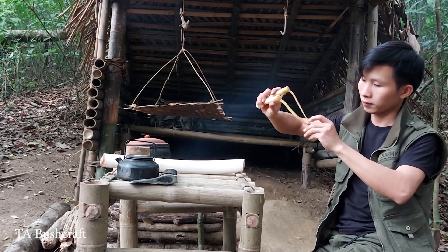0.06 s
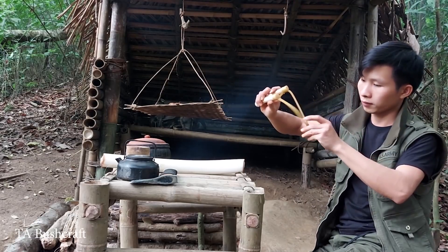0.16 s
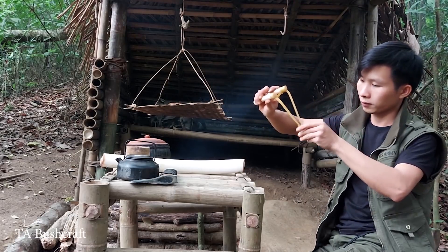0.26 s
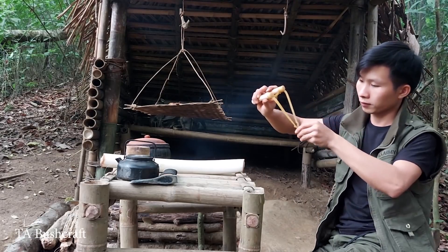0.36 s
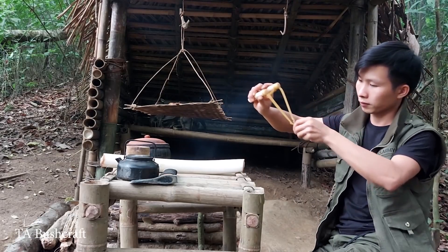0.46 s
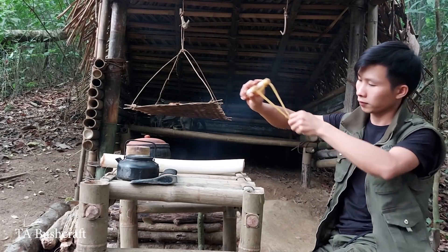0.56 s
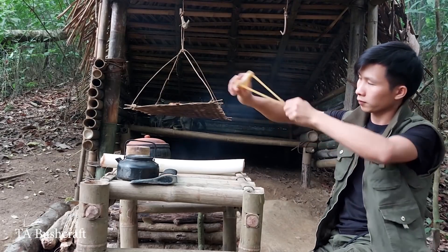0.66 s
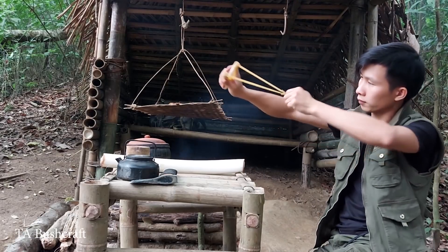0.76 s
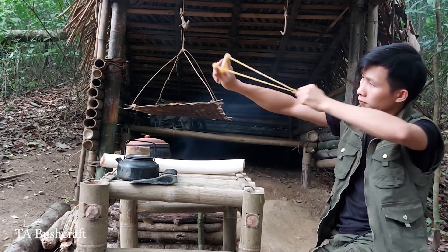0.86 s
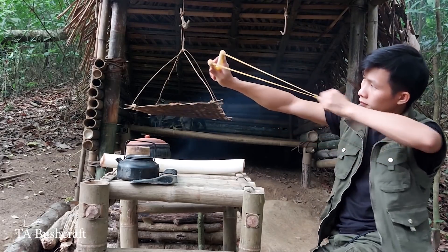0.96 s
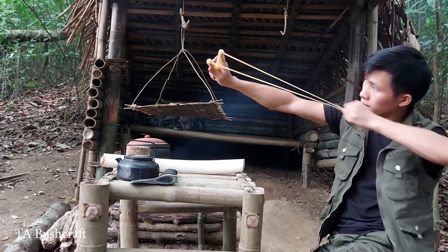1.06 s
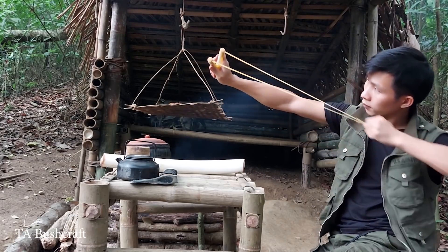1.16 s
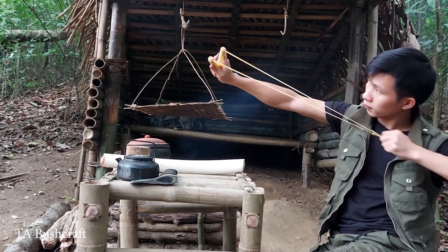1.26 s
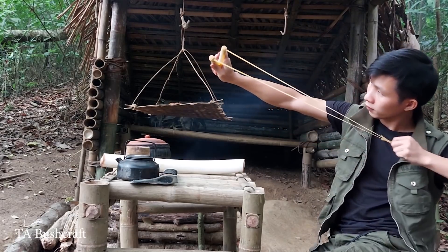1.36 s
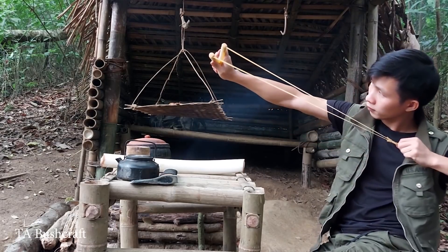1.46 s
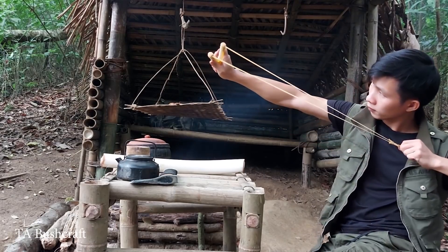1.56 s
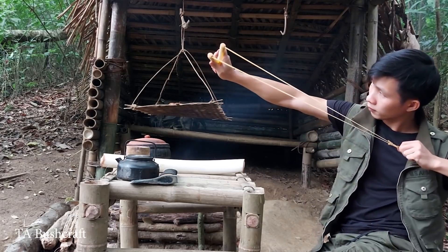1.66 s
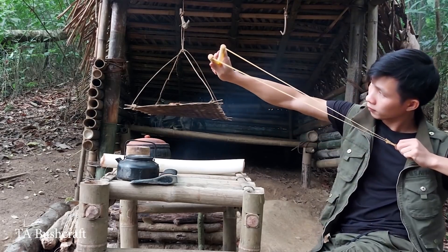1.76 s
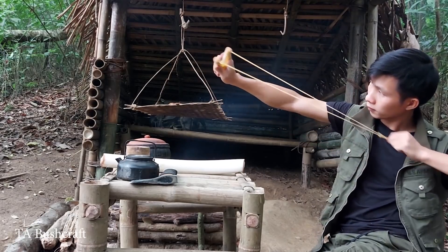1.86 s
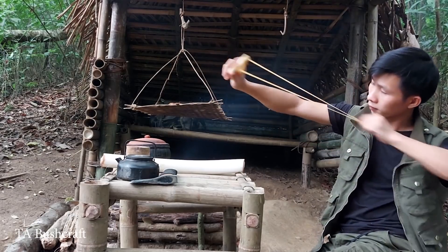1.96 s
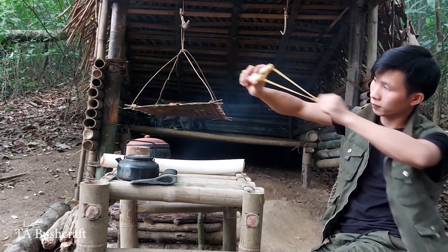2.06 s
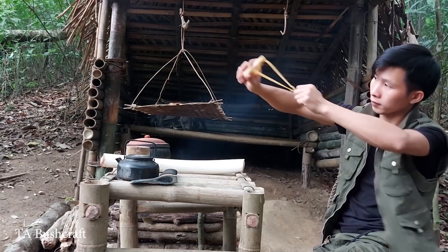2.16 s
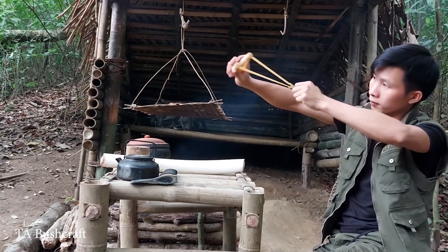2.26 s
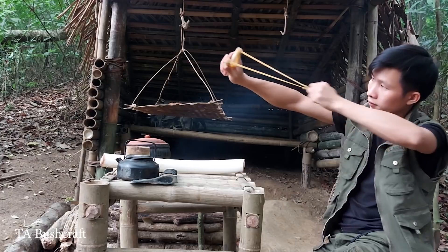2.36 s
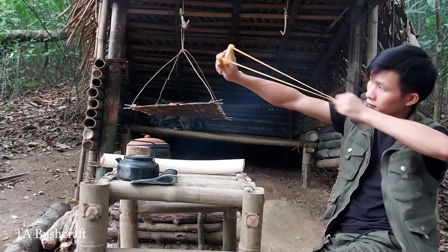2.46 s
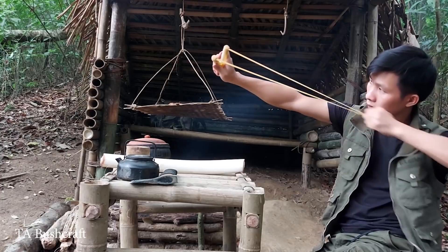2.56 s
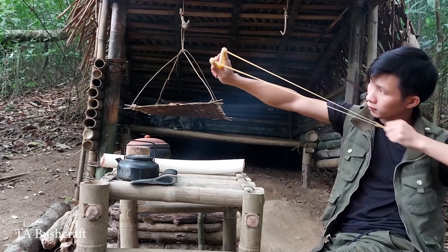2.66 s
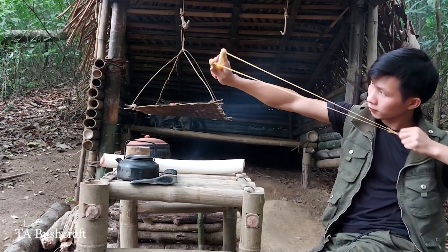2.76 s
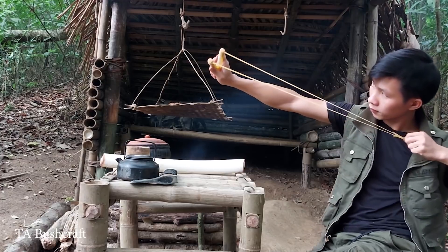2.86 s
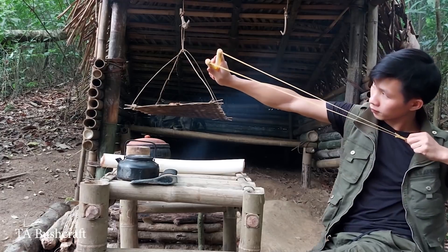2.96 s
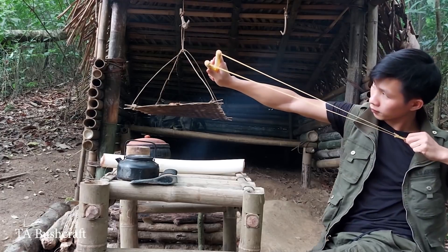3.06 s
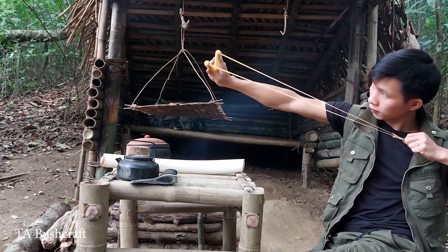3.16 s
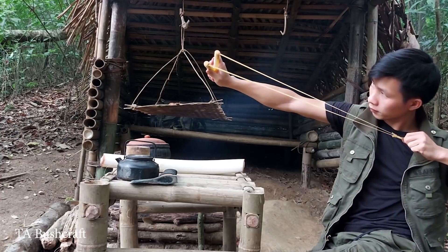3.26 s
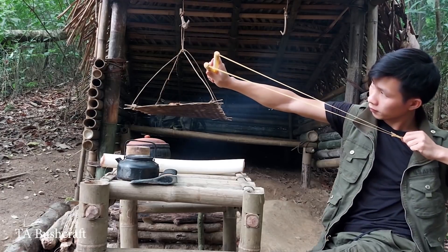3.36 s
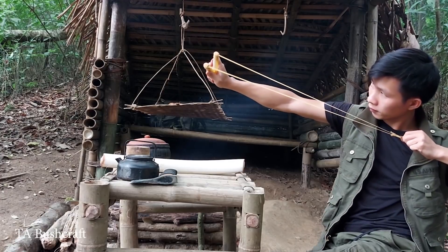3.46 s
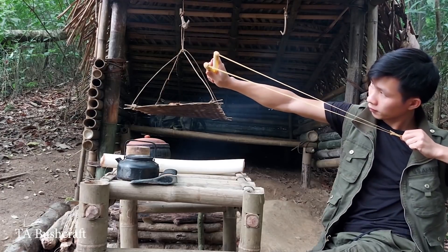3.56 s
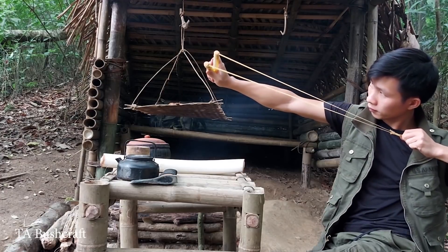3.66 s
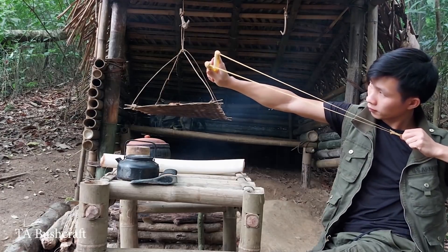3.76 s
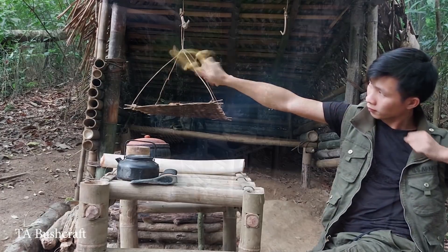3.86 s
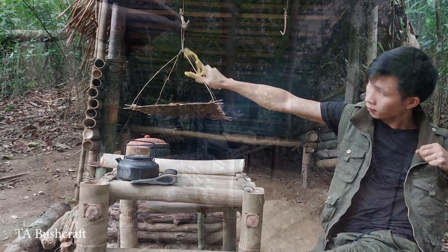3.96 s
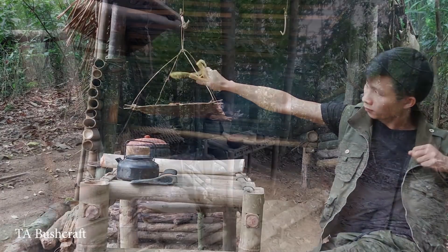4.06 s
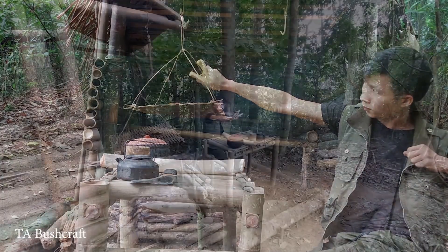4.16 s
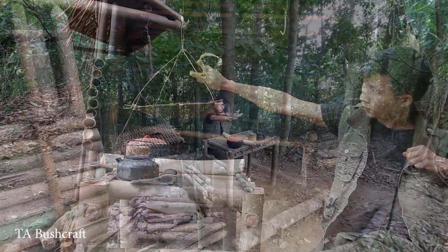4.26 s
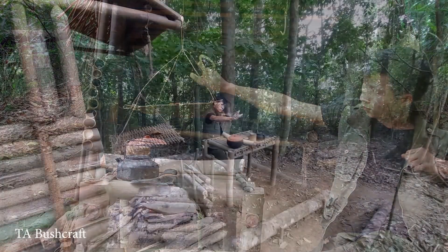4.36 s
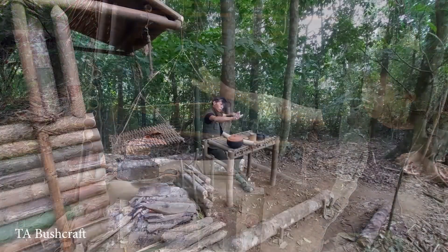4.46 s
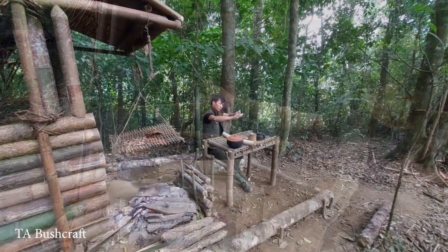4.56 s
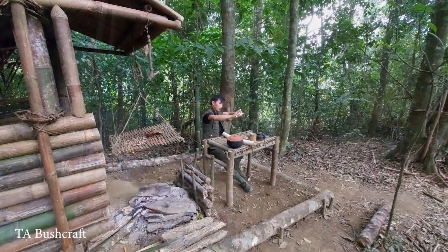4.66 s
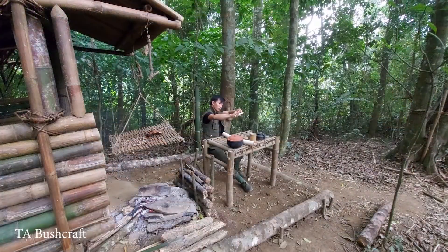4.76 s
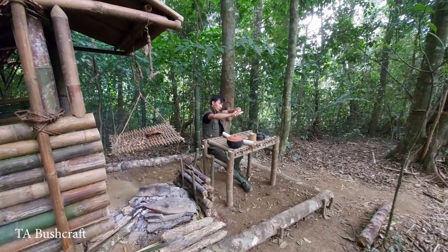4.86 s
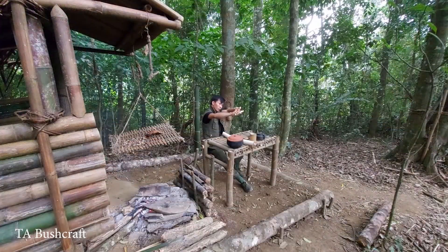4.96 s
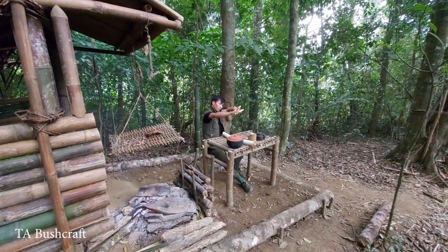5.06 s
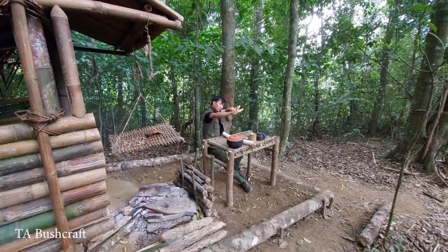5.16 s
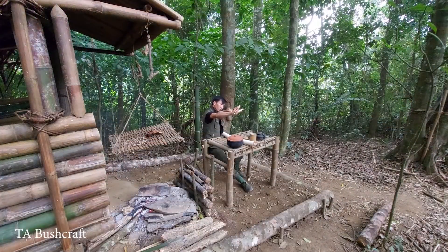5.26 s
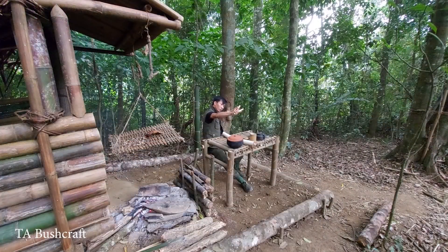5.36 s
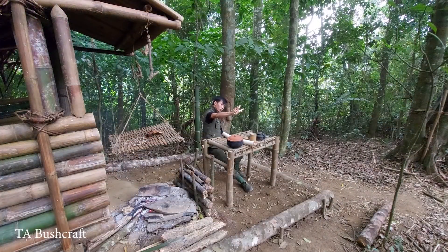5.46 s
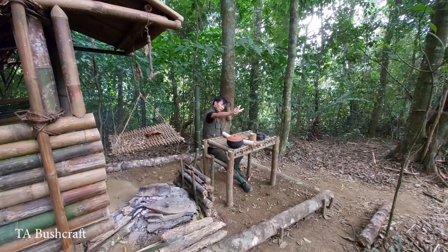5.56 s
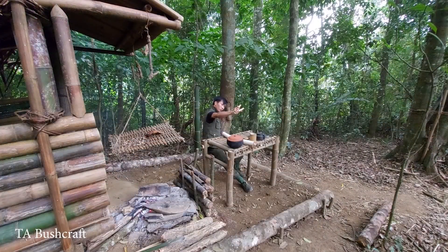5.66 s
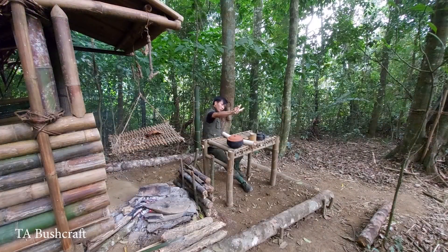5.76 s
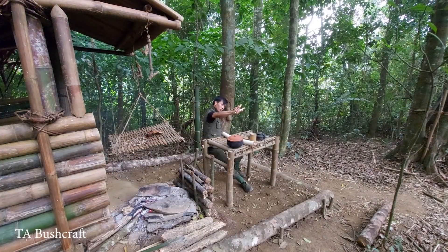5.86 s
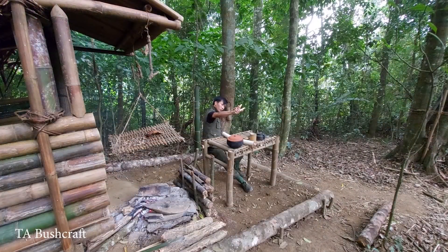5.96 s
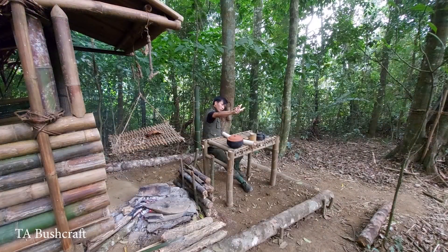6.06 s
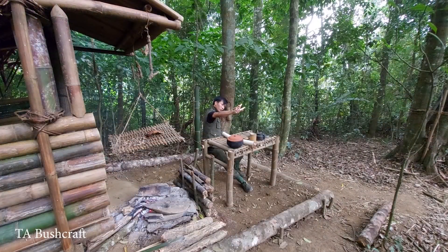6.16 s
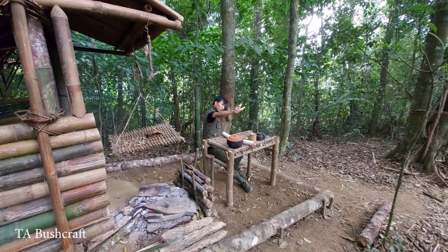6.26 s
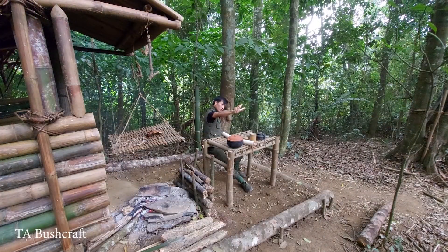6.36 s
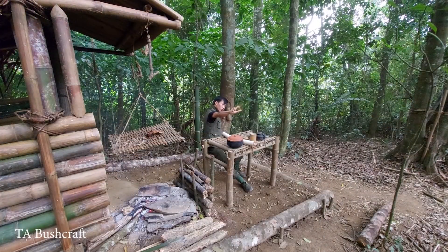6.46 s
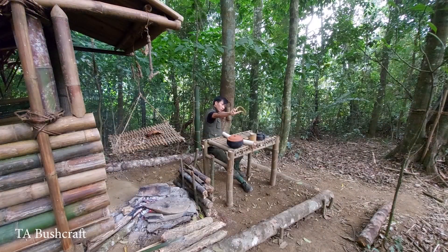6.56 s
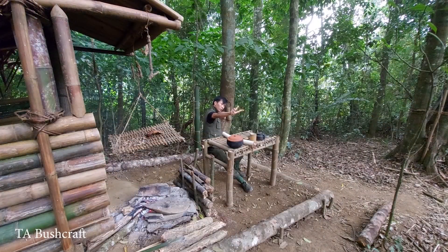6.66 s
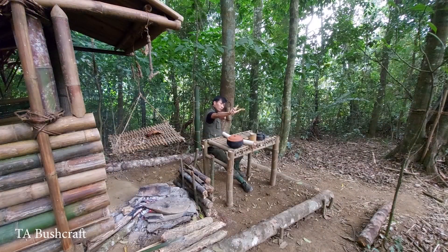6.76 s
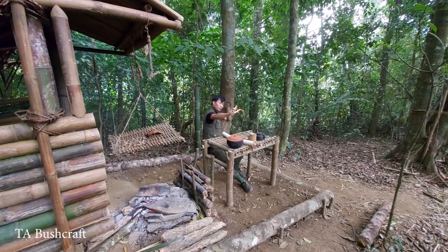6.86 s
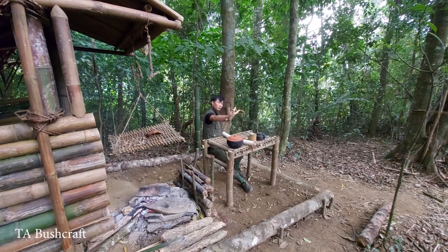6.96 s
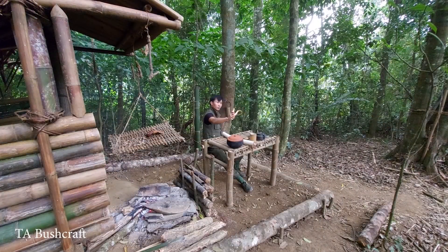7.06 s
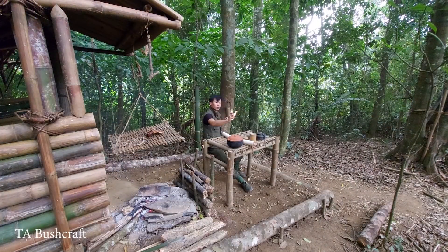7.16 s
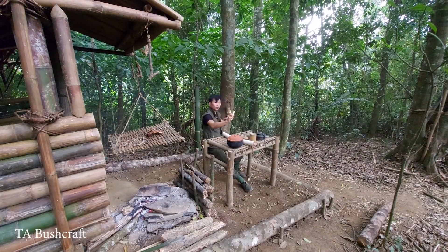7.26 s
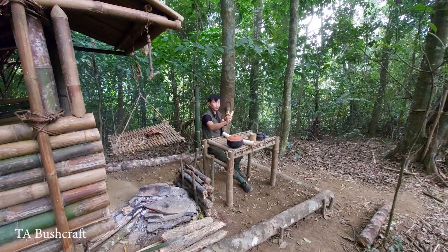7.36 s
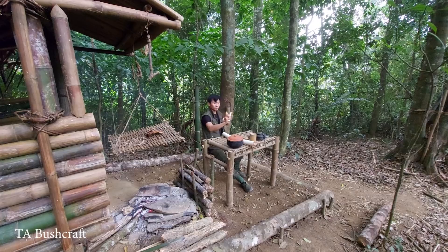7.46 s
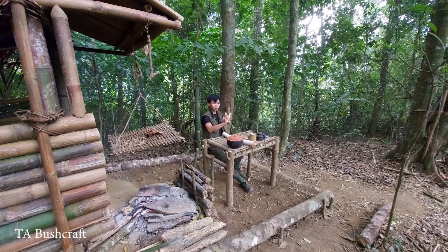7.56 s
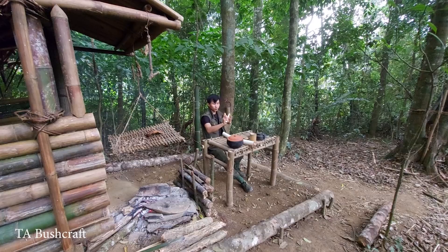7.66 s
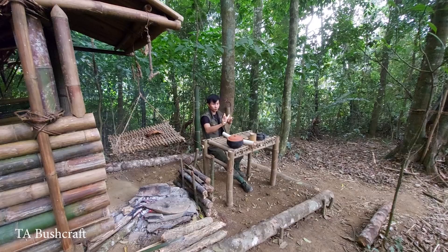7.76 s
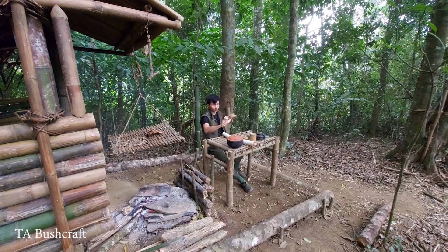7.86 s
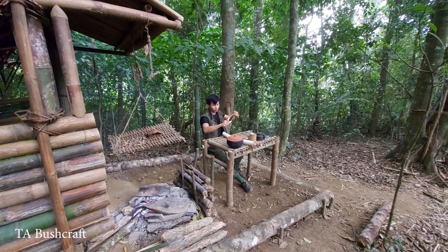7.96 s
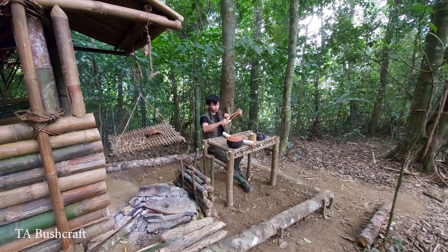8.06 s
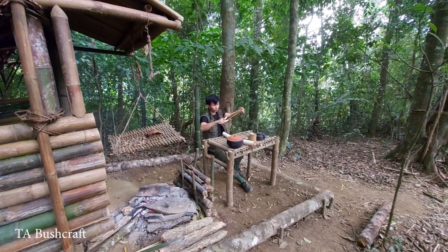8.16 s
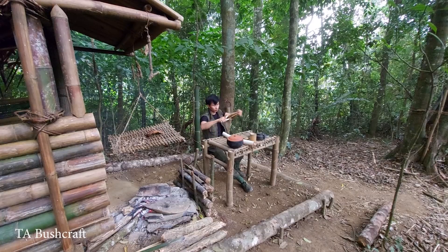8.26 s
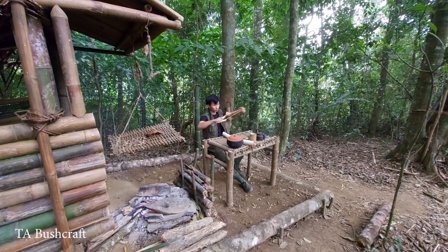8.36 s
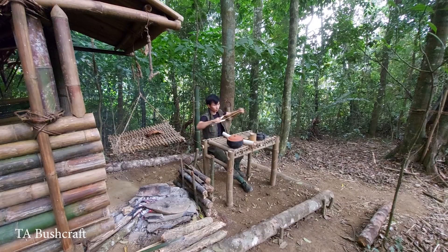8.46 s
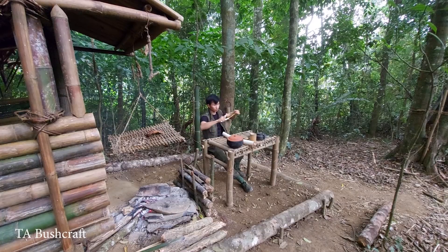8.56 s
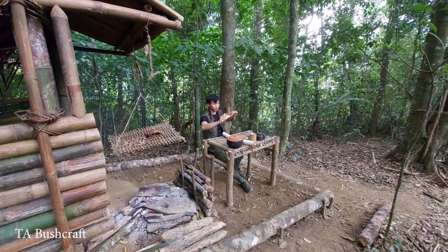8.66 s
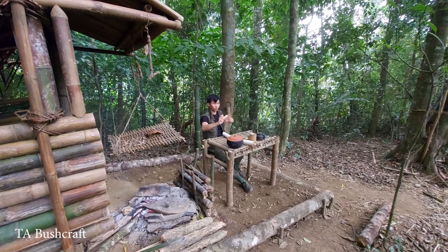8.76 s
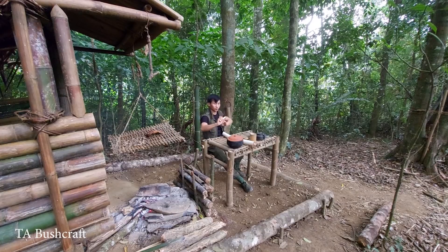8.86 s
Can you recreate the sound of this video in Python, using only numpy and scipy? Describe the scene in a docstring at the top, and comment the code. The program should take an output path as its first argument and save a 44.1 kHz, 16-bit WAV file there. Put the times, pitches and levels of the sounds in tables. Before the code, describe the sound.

A hushed forest, about nine seconds, in wide stereo: soft low air, a steady insect drone near 5 kHz and fine hiss. From 0.5 to 2.8 s rubber bands creak and rub very quietly in the hand, with dry finger ticks; thin rising chirps and a quick hoarse bird phrase sound far off. At 3.9 s the slingshot fires very close: a tiny whip rush, a hard bright crack and slap, a dull wooden knock and a low air thump mainly left, then a hissy echo from trunks fading within half a second. From about 4.3 s a bird hoots in quick threes near 790 Hz roughly every 0.65 s. A sharper tick comes at 4.75 s, just after a thin steel clink. At 6.4 s the second crack hits, with less air thump. Afterwards only hoots, faint high clinks around 7.7 to 8.3 s, ticks and insects remain.

```python
"""A slingshot fires twice close to a stereo microphone at a forest camp: the bands whip forward, the pouch slaps,
the rubber cracks, and the trunks scatter a bright noise tail. The first puff of air hits mainly the left port.
In the hand, rubber creaks in grains of noise, fingers tick and steel shot rings in short noise bursts.
Out in the forest one bird hoots in threes and others chirp far off, all as gliding sines with echo;
behind them lie low air, an insect drone near 5 kHz and a fine hiss, all shaped noise."""
import sys
import numpy as np
from scipy import signal
from scipy.fft import rfft, irfft, next_fast_len
from scipy.io import wavfile
from scipy.ndimage import uniform_filter1d, map_coordinates

SR = 44100
rng = np.random.default_rng(int(sys.argv[2]) if len(sys.argv) > 2 else 0)


def pcm_store(signal):
    """Save signal as 16-bit PCM."""
    levels = np.round(np.clip(np.atleast_2d(signal), -1, 1) * 32767)
    wavfile.write(sys.argv[1], SR, levels.astype(np.int16).T)


N = 392931


def amp(db):
    """Decibels to gain."""
    return 10 ** (np.asarray(db) / 20)


def unit(x):
    """Scaled to rms 1."""
    return x / np.sqrt(np.mean(x ** 2) + 1e-20)


def along(points, hz):
    """Values at hz, read from (Hz, value) points on a log frequency axis."""
    point_hz, values = np.transpose(points)
    return np.interp(np.log(hz + 1), np.log(point_hz + 1), values)


def wobble(rate):
    """A smooth random curve with rate knots a second."""
    knots = rng.standard_normal(int(N * rate / SR) + 4)
    return map_coordinates(knots, [np.arange(N) * rate / SR])


def fade(t, t60):
    """Silence before t = 0, then an exponential decay by 60 dB in t60 seconds."""
    return (t >= 0) * np.exp(-np.log(1000) * np.abs(t) / t60)


def add(out, s, x):
    """Mix x into out from second s on."""
    start = round(s * SR)
    x = x[..., max(-start, 0):N - start]
    start = max(start, 0)
    out[..., start:start + x.shape[-1]] += x


# Likeness of the two microphone ports. Each row: frequency in Hz, left-right correlation from 0 to 1.
PORT_LIKENESS = [(60, 0.24), (300, 0.25), (800, 0.22), (2000, 0.018), (5000, 0.002), (12000, 0.028)]


def noise(spectrum, size=N, rings=()):
    """Stereo noise of rms 1 with resonant humps; the ports are partly alike in the bass, hardly in the treble."""
    m = next_fast_len(size)
    hz = np.fft.rfftfreq(m, 1 / SR)
    level = along(spectrum, hz)
    for ring_hz, width_hz, db in rings:
        level = level + db / (1 + (2 * (hz - ring_hz) / width_hz) ** 2)
    # mid and side in this proportion give the wanted correlation
    turn = np.arccos(np.clip(along(PORT_LIKENESS, hz), -1, 1)) / 2
    white = rfft(rng.standard_normal((2, m)))
    mid, side = irfft(white * amp(level) * [np.cos(turn), np.sin(turn)], m)[:, :size]
    return unit(np.array([mid + side, mid - side]))


def among_trees(x, t60, direct_db, wet_db):
    """A sound plus the diffuse answer of trunks and leaves: convolution with decaying noise."""
    t = np.arange(SR) / SR
    swell = 1 - np.exp(-t / .008)
    tail = noise([(20, 0), (20000, 0)], size=SR) * fade(t, t60) * swell
    wet = signal.fftconvolve(np.atleast_2d(x), tail / np.linalg.norm(tail[0]), axes=1)[:, :N]
    return amp(direct_db) * x + amp(wet_db) * wet


# The sharp first crack of rubber on the fork, close by.
# Each row: frequency in Hz, relative level per Hz in dB.
CRACK_COLOUR = [(60, -16), (400, -6.5), (1000, -10), (1900, -8), (3300, -6), (5200, 2), (6200, 0),
                (7300, -6), (10500, 0.5), (13000, -2), (15800, -6)]


def rubber_crack(t, crack_db, t60, rings):
    """Rubber hits the fork: a burst of noise with a rise of about a millisecond and a short decay."""
    rise = np.clip(t / 0.00097, 0, 1)
    return amp(crack_db) * fade(t, t60) * rise * noise(CRACK_COLOUR, size=SR, rings=rings)


# Echo from the far trunks, with bass and top lost on the way.
# Each row: frequency in Hz, relative level per Hz in dB.
FAR_ECHO_COLOUR = [(100, -15.5), (1000, -14), (2000, -10.5), (2400, 0.5), (3400, -3.5), (4400, 4.5),
                   (7000, -3), (10500, -2), (15800, -12)]


def whip_and_trunks(t, lead, whip_db, scatter_db, colour, rings, near_t60=0.39, far_t60=0.6, far_db=-17):
    """Bands rush through the air before the crack; near and far trunks scatter it back as decaying noise."""
    whip = amp(whip_db) * np.exp(-(t / lead) ** 6) * (t < .001)
    # the echo builds within 4.4 ms and its level trembles slightly
    scatter = amp(scatter_db + 0.3 * wobble(160)[:SR]) * np.clip(t / 0.0044, 0, 1)
    rush = (whip + scatter * fade(t, near_t60)) * noise(colour, size=SR, rings=rings)
    far_noise = noise(FAR_ECHO_COLOUR, size=SR, rings=rings)
    far = scatter * amp(far_db) * fade(t, far_t60) * far_noise
    return rush + far


def pouch_slap(t, slap_db, width=0.00039):
    """The pouch stops dead: one push of air and a slower suction."""
    age = np.maximum(t - .0014, 0) / width
    push, suction = np.exp(-age), np.exp(-age / 4) / 16
    return amp(slap_db) * np.e * age * (push - suction)


# Dull knock of fork and fist, close by. Each row: frequency in Hz, relative level per Hz in dB.
KNOCK_COLOUR = [(30, -13.5), (70, -1.5), (125, -0.5), (200, -9.5), (320, 3.5), (400, -6.5), (520, -3),
                (650, -5.5), (900, -12.5), (1180, -9.5), (1500, -14), (3000, -31.5)]
# Low modes of the wooden fork in the fist. Each row: frequency in Hz, level in dB, 60 dB decay in seconds.
FORK_MODES = [(308.4, -19.5, 0.11), (388, -25, 0.037), (502, -23, 0.021)]


def fork_knock(t, knock_db, t60=0.13):
    """Fork and fist give a dull noise burst and the wooden modes ring as decaying sines, alike on both ports."""
    knock = amp(knock_db) * fade(t - .001, t60) * noise(KNOCK_COLOUR, size=SR)[0]
    for hz, db, mode_t60 in FORK_MODES:
        knock = knock + amp(db) * fade(t, mode_t60) * np.sin(2 * np.pi * hz * t)
    return knock


def air_puff(t, start_hz, end_hz, settle, t60):
    """A gust overloads a microphone port, which swings back ever more slowly: a falling, decaying sine."""
    age = np.maximum(t, 0)
    cycles = end_hz * age + (start_hz - end_hz) * settle * (1 - np.exp(-age / settle))
    return -np.sin(2 * np.pi * cycles) * fade(t, t60)


# Two short low knocks at the second shot, near 780 and 1155 Hz.
# Each row: centre in seconds, frequency in Hz, level in dB, half length in seconds.
SHOT_KNOCKS = [(6.3973, 780.5, -14, 0.0039), (6.3989, 1155, -21, 0.0036)]


def shot_knocks(out, t, early):
    """Two short low knocks at the second shot: sines under bell-shaped swells, mixed into out."""
    for s, hz, db, half in SHOT_KNOCKS:
        add(out, s - early, amp(db) * np.exp(-(t / half) ** 2) * np.sin(2 * np.pi * hz * t))


# The two shots, close to the microphone. Each row: start in seconds, whip lead in seconds, whip level in dB,
# crack level in dB, crack 60 dB decay in seconds, scatter level in dB, slap level in dB, knock noise level in dB,
# air puff level in dB, puff delay in seconds, final puff frequency in Hz, puff on the right port in dB re left.
SHOT_TABLE = [(3.8929, 0.0071, -20.5, -0.5, 0.019, -11, -5.5, -24, -3, .003, 52.1, -28.5),
              (6.3955, 0.005, -22, -0.5, 0.034, -11, -9, -18.5, -11.5, .006, 95, -1)]
# Colour of whip and near echo, one list for each shot.
# Each row: frequency in Hz, relative level per Hz in dB.
SHOT_COLOURS = [
    [(30, -19), (100, -15.5), (200, -17), (350, -19.5), (600, -9.5), (1000, -15), (2000, -9.5), (3200, -6),
     (4600, -3.5), (7500, -6), (10000, 3), (13000, 0), (15800, -3.5)],
    [(30, -22.5), (100, -12.5), (200, -17.5), (320, -15.5), (600, -14), (1000, -11), (2000, -11),
     (3400, -5), (4600, -0.5), (7500, -4.5), (10500, 5), (13000, 2.5), (15800, -5)],
]
# Resonances of the taut bands and pouch, one list for each shot.
# Each row: frequency in Hz, width in Hz, height in dB.
BAND_RINGS = [
    [(330, 68, 5), (1100, 180, 4), (2704, 320, 5.5), (4450, 500, 1.5)],
    [(322, 36, 4.5), (810, 160, 4.5), (1822, 220, 1.5), (2660, 470, 12.5), (6040, 270, 4)],
]


def shots(puff_cycles=4.7):
    """The bands whip, crack and slap, the fork knocks, air puffs at the ports and the forest answers."""
    out = np.zeros((2, N))
    early = .02  # seconds kept before t = 0 for the whip
    t = np.arange(SR) / SR - early
    for shot, colour, rings in zip(SHOT_TABLE, SHOT_COLOURS, BAND_RINGS):
        (s, lead, whip_db, crack_db, crack_t60, scatter_db, slap_db, knock_db,
         puff_db, puff_delay, puff_hz, right_db) = shot
        bright = rubber_crack(t, crack_db, crack_t60, rings)
        bright = bright + whip_and_trunks(t, lead, whip_db, scatter_db, colour, rings)
        thump = pouch_slap(t, slap_db) + fork_knock(t, knock_db)
        puff = amp(puff_db) * air_puff(t - puff_delay, start_hz=118, end_hz=puff_hz, settle=0.0032,
                                       t60=puff_cycles / puff_hz)
        # dB offsets for the left and the right port
        add(out, s - early, bright * amp([[.4], [-.4]]) + thump + puff * amp([[0], [right_db]]))
    shot_knocks(out, t, early)
    return out


# Rubs of bands, fingers and sleeve in the hand while the slingshot is drawn and eased off.
# Each row: peak in seconds, swell in seconds, release in seconds, rubbing level in dB,
# crackle level in dB before a common trim.
RUB_EVENTS = [(.55, .04, 0.061, -71, -72), (1.08, 0.031, .04, -67, -60.5), (1.235, 0.087, .08, -64, -56.5),
              (1.58, 0.14, 0.12, -70.5, -61), (2.08, 0.051, 0.18, -66.5, -66.5),
              (2.222, 0.0071, 0.019, -58, -55.5), (2.278, 0.036, .028, -50.5, -63),
              (2.73, .1, .07, -70, -56.5), (5.5, .12, .15, -72, -82)]
# Soft rubbing. Each row: frequency in Hz, relative level per Hz in dB.
RUB_COLOUR = [(120, -27), (230, -8), (350, 5.5), (450, 1), (600, 1.5), (740, 0), (1000, -2), (1300, -5),
              (1900, -11), (2600, -21), (4000, -35)]
# Bright crackle. Each row: frequency in Hz, relative level per Hz in dB.
CRACKLE_COLOUR = [(1000, -17), (4000, 1.5), (7000, -3), (11000, 5), (15500, -14.5)]


def drawing(crackle_trim_db=-1, roundness=1.25):
    """Rubber and sleeve stick and slip in tiny grains: noise of jumping level under each swelling rub."""
    t, rubbing, crackling = np.arange(N) / SR, np.zeros(N), np.zeros(N)
    for s, swell, release, rub_db, crackle_db in RUB_EVENTS:
        side = np.where(t < s, swell, release)
        effort = np.exp(-(np.abs(t - s) / side) ** roundness)  # roundness 1 is a sharp peak, 2 a bell
        rubbing += amp(rub_db) * effort
        crackling += amp(crackle_db + crackle_trim_db) * effort
    rub = rubbing * unit(noise(RUB_COLOUR) * amp(4.3 * wobble(180)))
    crackle = crackling * unit(noise(CRACKLE_COLOUR) * amp(3.7 * wobble(570)))
    return rub + crackle


# Ticks of pouch, bands and fork in the fingers.
# Each row: start in seconds, level in dB before trims and echo, body in dB before its trim.
FINGER_TICKS = [(1.2068, -43, -13), (1.2463, -44, -2), (1.5522, -49, -11), (2.2906, -41.5, 3),
                (2.5824, -47, -20), (2.685, -46, -15), (2.7, -47, 2), (3.626, -53, 8.5), (4.7475, -46, 0),
                (4.7553, -28.5, -17), (4.7593, -37, -9), (7.5605, -48, -19), (8.4677, -52, 1.5),
                (8.485, -50, 1), (8.765, -43, -28)]
# Bright snap of a tick. Each row: frequency in Hz, relative level per Hz in dB.
SNAP_COLOUR = [(1000, -37), (2000, -24.5), (4000, -6), (7000, -10), (10500, 0), (13000, -3.5), (15500, -11)]
# Fuller body of a tick. Each row: frequency in Hz, relative level per Hz in dB.
TICK_BODY_COLOUR = [(200, -35), (900, -18), (2000, -20), (4500, 11), (8000, 1), (15000, -26.5)]


def ticks(snap_db=5, body_trim_db=4, t60=.009):
    """Small dry contacts in the fingers: very short bursts of snap and body noise."""
    out, t = np.zeros((2, N)), np.arange(SR // 10) / SR
    for s, db, body_db in FINGER_TICKS:
        snap = amp(snap_db) * noise(SNAP_COLOUR, size=len(t))
        body = amp(body_db + body_trim_db) * noise(TICK_BODY_COLOUR, size=len(t))
        add(out, s, amp(db) * fade(t, t60) * (snap + body))
    return among_trees(out, t60=0.2, direct_db=-5.5, wet_db=-11)


# Steel shot clinks in the hand. Each row: start in seconds, level in dB before the echo mix.
STEEL_CLINKS = [(4.6608, -39), (7.7154, -52.5), (8.114, -55), (8.3462, -48)]
# Ring of the steel. Each row: frequency in Hz, relative level per Hz in dB.
STEEL_COLOUR = [(1000, -71), (3800, -27), (6000, -30.5), (7300, -18), (8500, -32.5), (9400, -15),
                (9780, 5.5), (10200, -21.5), (12000, -19), (15500, -23)]


def clinks(t60=0.18):
    """Steel balls touch with a thin, high ring: decaying noise with a narrow peak near 9.8 kHz."""
    out, t = np.zeros((2, N)), np.arange(SR // 2) / SR
    for s, db in STEEL_CLINKS:
        add(out, s, amp(db) * fade(t, t60) * noise(STEEL_COLOUR, size=len(t)))
    return among_trees(out, t60=0.52, direct_db=-0.5, wet_db=-7.0)


def whistle(length, start_hz, end_hz, rasp_hz=0):
    """One gliding sine note; a fast random tremor of the pitch makes it hoarse."""
    u = np.linspace(0, 1, int(length * SR))
    tremor = rng.standard_normal(len(u))
    for _ in range(2):
        tremor = uniform_filter1d(tremor, size=110)
    hz = start_hz + (end_hz - start_hz) * u + rasp_hz * np.clip(unit(tremor), -2, 2)
    return np.sin(np.pi * u).clip(0) * np.sin(2 * np.pi * np.cumsum(hz) / SR)


# Calls of the hooting bird among the trees. Each row: middle hoot in seconds, level in dB before the shape
# and echo, pitch in Hz before the shape, gap to the last hoot in seconds.
HOOT_CALLS = [(4.355, -51, 788, 0.077), (5.024, -51.5, 788, 0.094), (5.709, -51, 790, 0.071),
              (6.357, -51.5, 785, 0.091), (7.006, -51.5, 794, .071), (7.65, -51.5, 789, 0.079),
              (8.311, -52, 800, .076)]
# The three hoots of every call.
# Each row: level in dB re the call, pitch ratio, glide to either side as a share of the pitch.
THREE_HOOTS = [(-7, .975, .06), (0.5, 1, .07), (0.46, 1.022, .05)]


def hooting_bird(first_lead=.076, onset_hz=890, onset_db=-9.0):
    """Falling hoots in threes, each a little higher; the high start of each carries mostly as echo."""
    hoots, onsets = np.zeros((2, N))
    for middle, call_db, call_hz, gap in HOOT_CALLS:
        times = [middle - first_lead, middle, middle + gap]
        for s, (db, ratio, glide) in zip(times, THREE_HOOTS):
            hz = call_hz * ratio
            hoot = whistle(.04, hz * (1 + glide), hz * (1 - glide))
            onset = whistle(0.014, onset_hz * 1.06, onset_hz / 1.06)
            add(hoots, s - .008, amp(call_db + db) * hoot)
            add(onsets, s - .012, amp(call_db + db + onset_db) * onset)
    hoots = among_trees(hoots, t60=0.53, direct_db=-3.0, wet_db=-7.5)
    return hoots + among_trees(onsets, t60=.7, direct_db=-5, wet_db=1.0)


# Far off, a bird with one thin rising note.
# Each row: start in seconds, level in dB before the echo mix, start and end pitch in Hz.
RISING_CALLS = [(-.03, -53.5, 5540, 6950), (2.299, -54, 5670, 7120), (3.649, -53.5, 5660, 7100),
                (5.787, -58.5, 6350, 6710), (7.543, -55, 5650, 7180)]
# Far off, a bird with a quick dipping and rising phrase.
# Each row: start in seconds, level in dB before the echo mix, pitch ratio.
PHRASE_CALLS = [(1.657, -51.5, 1), (2.178, -56.5, .96), (3.312, -61.5, 0.96)]
# Notes of the phrase. Each row: delay in seconds, length in seconds, start and end pitch in Hz before the ratio,
# level in dB re the phrase, rasp in Hz.
NOTES_OF_PHRASE = [(0, .055, 3600, 3330, -2.5, 109.8), (.018, .028, 3399, 2899, -7, 150.1),
                   (.028, .03, 2350, 1980, -7.5, 70), (.04, .026, 3850, 4200, -3, 170),
                   (.052, .052, 4287, 4140, 0, 130)]
# Single faint gliding notes: far birds, and two near 1.9 kHz probably rubber squeaking in the draw.
# Each row: start in seconds, length in seconds, start and end pitch in Hz, level in dB before the echo mix.
FAINT_NOTES = [(0.369, 0.44, 2560, 2340, -78), (.594, 0.062, 3100, 3980, -66.5),
               (0.836, .32, 3950, 3800, -75), (1.137, .12, 1824, 1910, -69), (1.423, .1, 1895, 2007, -71),
               (2.596, .38, 2274, 2466, -79.5), (2.949, 0.14, 2550, 2490, -74.5),
               (4.552, 0.073, 3210, 3700, -71), (5.021, 0.052, 3470, 3410, -65.5),
               (5.068, 0.04, 3110, 3040, -63.5), (7.709, .026, 3750, 3830, -64.5)]


def far_birds_and_squeaks():
    """Hoarse far chirps and faint notes, two probably rubber squeaks: gliding sines heard mostly as echo."""
    out = np.zeros(N)
    for s, db, start_hz, end_hz in RISING_CALLS:
        add(out, s, amp(db) * whistle(.058, start_hz, end_hz, rasp_hz=240))
    for s, db, ratio in PHRASE_CALLS:
        for delay, length, start_hz, end_hz, note_db, rasp_hz in NOTES_OF_PHRASE:
            note = whistle(length, start_hz * ratio, end_hz * ratio, rasp_hz)
            add(out, s + delay, amp(db + note_db) * note)
    for s, length, start_hz, end_hz, db in FAINT_NOTES:
        add(out, s, amp(db) * whistle(length, start_hz, end_hz, rasp_hz=90))
    return among_trees(out, t60=0.82, direct_db=-2.5, wet_db=6.0)


# Low moving air all around. Each row: frequency in Hz, relative level per Hz in dB.
AIR_COLOUR = [(20, -29.5), (35, -13.5), (60, -0.5), (130, -1), (200, -6.5), (300, -3.5), (480, -8.5),
              (1000, -14), (2500, -17), (3200, -19.5), (3800, -21), (5000, -46)]
# Chorus of insects. Each row: frequency in Hz, relative level per Hz in dB.
DRONE_COLOUR = [(2120, -42.5), (3600, -19.5), (4470, -8.5), (5050, 3), (5300, -1.5), (5750, -9),
                (6480, -20.5), (7000, -20), (9100, -49.5), (15400, -120)]
# Fine high hiss. Each row: frequency in Hz, relative level per Hz in dB.
HISS_COLOUR = [(3820, -36.5), (6500, -12.5), (7630, -8), (8690, 0.5), (11400, 4.5), (14200, 2.5),
               (15800, -4)]


def forest(air_db=-68.0, drone_db=-63, hiss_db=-66.02):
    """Low moving air, an almost steady insect chorus and a fine hiss: three shaped noises."""
    air_level = amp(air_db + 0.82 * wobble(2.5))
    drone_level = amp(drone_db + .3 * wobble(0.43) + .4 * wobble(8.2))
    # air and hiss are slightly stronger on the left port, in dB
    air = air_level * noise(AIR_COLOUR) * amp([[.4], [-.4]])
    drone = drone_level * noise(DRONE_COLOUR)
    hiss = amp(hiss_db) * noise(HISS_COLOUR) * amp([[1.1], [-1.1]])
    return air + drone + hiss


def scene():
    """Everything heard at the camp, from the slingshot to the forest behind it."""
    return shots() + drawing() + ticks() + clinks() + hooting_bird() + far_birds_and_squeaks() + forest()


def record(dry, top_hz=15880):
    """Peaks clip at full scale; the treble ends steeply at the band limit."""
    m = next_fast_len(N + SR // 2)
    hz = np.fft.rfftfreq(m, 1 / SR)
    clipped = np.clip(dry, -1, 1)
    passband = 1 / (1 + (hz / top_hz) ** 200)
    return irfft(rfft(clipped, m) * passband, m)[:, :N]


dry = scene()
out = record(dry)
pcm_store(out)
```